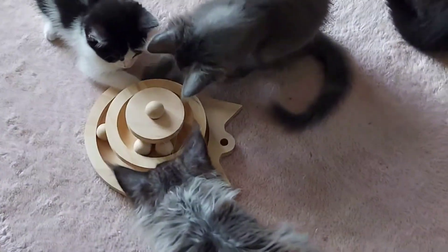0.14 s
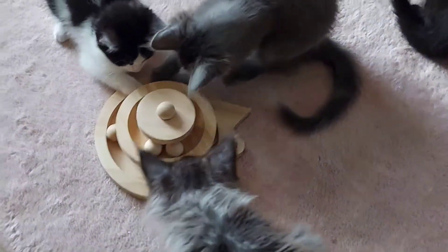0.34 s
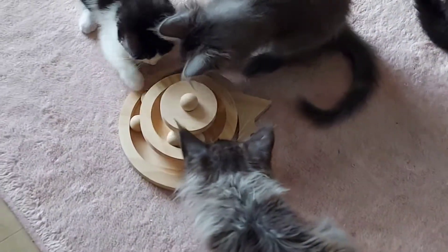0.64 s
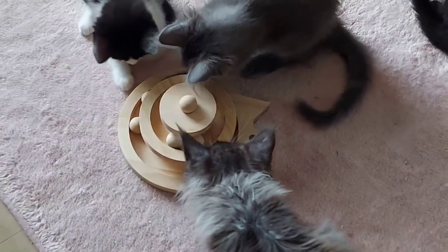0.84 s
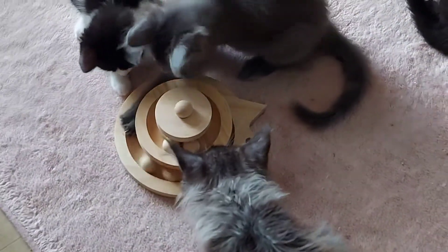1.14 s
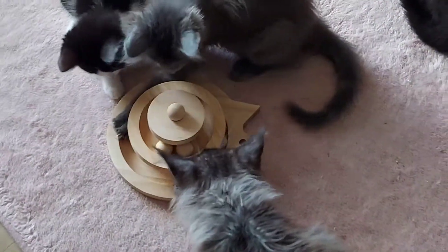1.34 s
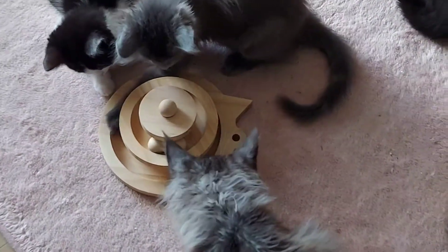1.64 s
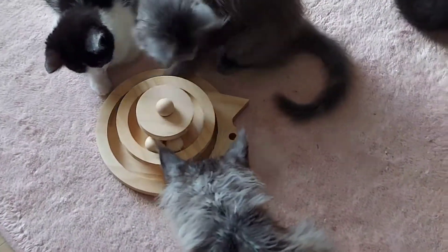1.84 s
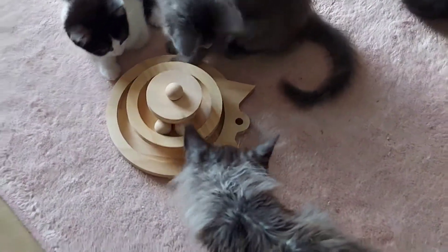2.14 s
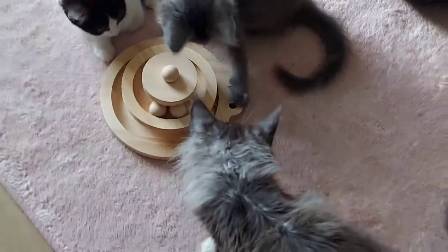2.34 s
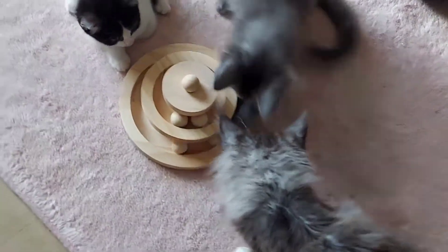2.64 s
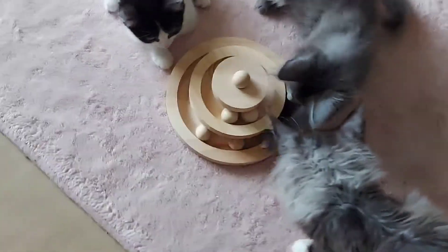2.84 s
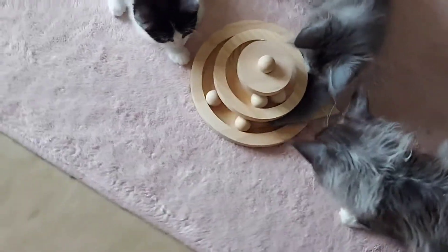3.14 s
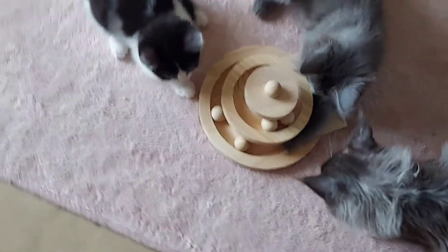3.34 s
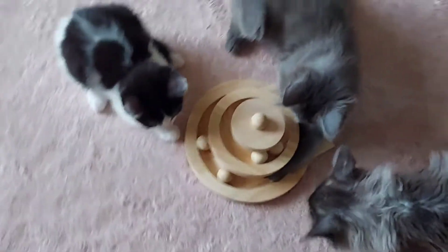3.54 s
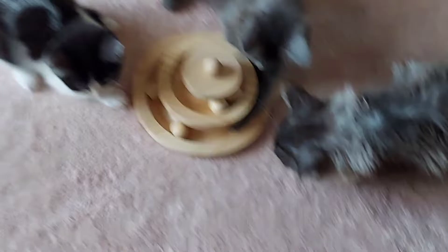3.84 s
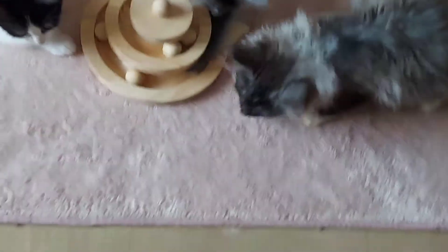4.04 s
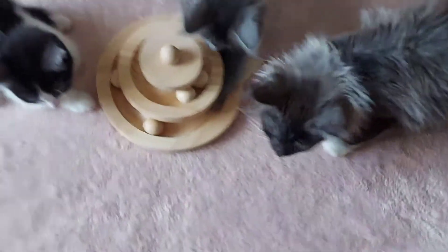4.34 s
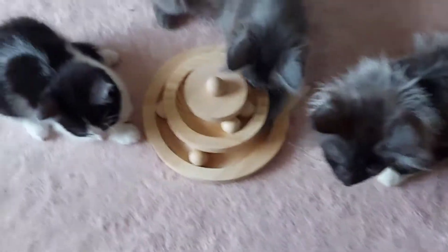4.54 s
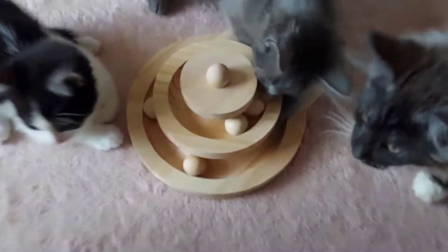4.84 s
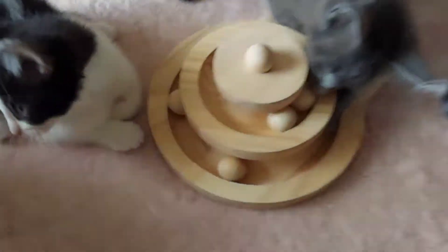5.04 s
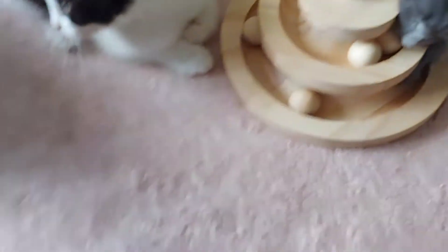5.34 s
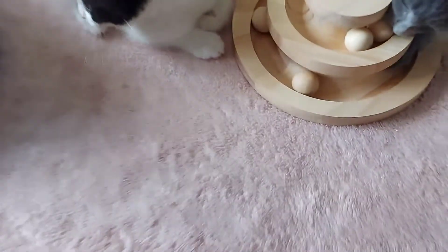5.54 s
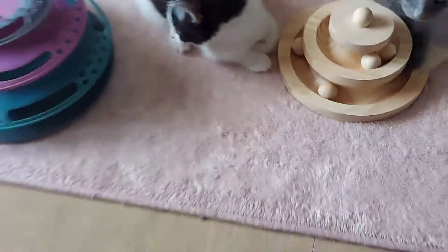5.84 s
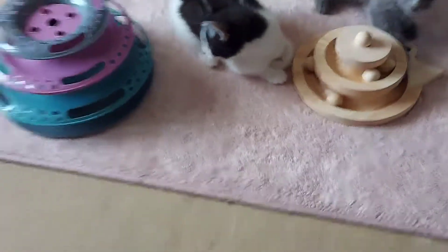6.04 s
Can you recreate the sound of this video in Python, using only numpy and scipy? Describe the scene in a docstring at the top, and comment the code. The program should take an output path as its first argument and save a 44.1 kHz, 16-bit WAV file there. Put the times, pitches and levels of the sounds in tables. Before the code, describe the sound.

Wooden balls knock, rattle and clack around a hollow wooden track as paws scuff carpet, then soft bumps and close clothing rustle.

```python
"""In a bare-sounding room, kittens bat wooden balls around a tiered wooden track standing on a carpet.
Rolling and knocks excite the track's damped modes; balls clack together as short bursts of bright noise.
Paws brush the pile as grainy high noise, and a thin high ring wavers as narrow-band noise.
Play dies down to a few soft bumps; clothing then rustles close to the microphone as noise with tiny catches.
A decaying diffuse tail and a faint steady noise make up the room."""
import sys
import numpy as np
from scipy import signal
from scipy.fft import rfft, irfft, next_fast_len
from scipy.io import wavfile
from scipy.ndimage import uniform_filter1d

SR = 44100
rng = np.random.default_rng(int(sys.argv[2]) if len(sys.argv) > 2 else 0)


def master(y):
    """Save y as 16-bit WAV."""
    cut = np.clip(np.atleast_2d(y).T, -1, 1)
    pcm = np.round(cut * 32767)  # scale
    wavfile.write(sys.argv[1], SR, pcm.astype(np.int16))


N = 273856

# All levels are relative: filters and mixing gains follow.
# Steady noise of the quiet room: (frequency [Hz], level [dB])
FLOOR_COLOUR = [(15, -59.5), (25, -34), (45, -27), (64, -5.5), (206, -21.5), (285, -17), (427, -27),
                (1290, -23.5), (3430, -35), (5730, -40), (12900, -26.5), (16000, -29.5)]
FLOOR_DB = -70
# Likeness of left and right in the noises: (frequency [Hz], correlation [-1 to 1])
EAR_LIKENESS = [(40, 0.7), (120, .92), (300, 0.84), (600, 0.78), (1200, 0.084), (2400, 0.098),
                (16000, 0.13)]
# Decay of the room's tail: (frequency [Hz], time to fall 60 dB [s])
ROOM_DECAY = [(150, 0.15), (500, 0.24), (1500, 0.34), (4000, 0.33), (8000, 0.46), (15000, 0.067)]
# Colour of the room's tail: (frequency [Hz], level [dB])
TAIL_COLOUR = [(100, -3.5), (220, -4), (450, 2.5), (1000, 0), (2000, -1.5), (4200, 0), (8000, -2),
               (15000, -5.5)]
CUTOFF_HZ = 15900

# Vibration modes of the wooden track: (frequency [Hz], level [dB], time to fall 60 dB [s])
TRACK_MODES = [(316.4, -31, 0.073), (416, -24, 0.061), (490, -28, 0.078), (630, -19.5, 0.051),
               (835, -16.5, 0.015), (1005.5, -15.5, 0.068), (1282, -8, 0.045), (1456, -13.5, 0.055),
               (1700, -1, 0.017), (1907, -3.5, 0.019), (2234, -0.5, 0.016), (2423, -4, 0.016),
               (2960, -10, 0.011), (3200, -25.5, .012), (3860, -12, 0.019), (4240, -19.5, 0.023),
               (4770, -39.5, .01)]
# A batted ball speeds up and runs out: (start [s], fastest [s], stop [s], level [dB])
BALL_ROLLS = [(0.0, .15, 0.54, -61), (.88, 1.2, 1.8, -50), (1.5, 1.78, 1.99, -60), (2.235, 2.31, 2.59, -56),
              (2.38, 2.68, 2.97, -55), (2.8, 3.0, 3.47, -70)]
RUMBLE_LAW, RATTLE_LAW = 1.51, 1.8   # amplitude as a power of speed
# A ball knocks on a rim: (time [s], peak level [dB], favoured frequency [Hz])
RIM_KNOCKS = [(0.033, -13, 1710), (0.2094, -27, 1654), (0.38, -44.5, 1270), (0.913, -34, 990),
              (0.924, -35, 630), (1.0234, -28, 1780), (1.1315, -29, 1130), (1.1381, -23.5, 1970),
              (1.254, -30.5, 1710), (1.2637, -27, 1680), (1.276, -25, 1790), (1.2877, -21.5, 1775),
              (1.2968, -29, 1720), (1.3203, -17, 2096), (1.33, -28, 1610), (1.3472, -23, 1690),
              (1.4242, -35, 1280), (1.451, -16, 1580), (1.4625, -29.5, 2040), (1.4867, -34.5, 1660),
              (1.5576, -29.5, 1700), (1.5937, -36, 1730), (1.6296, -37.5, 1270), (1.704, -47, 1270),
              (1.8098, -23, 1730), (1.8199, -20.5, 1740), (2.256, -41, 1720), (2.273, -37, 1680),
              (2.2933, -14, 1950), (2.3264, -25.5, 1950), (2.3928, -27.5, 1940), (2.4424, -31, 1630),
              (2.4874, -32.5, 1210), (2.5026, -27, 1690), (2.5133, -23, 1700), (2.523, -33, 1270),
              (2.599, -29.5, 1330), (2.659, -31, 2000), (2.703, -33, 1270), (2.7138, -12.5, 2100),
              (2.7804, -30, 1270), (2.9201, -39, 1420), (2.9914, -41.5, 1270)]
USUAL_KNOCK_DB = -29
BODY_DB, BODY_LOSS = 0.5, 0.32   # low modes at a usual knock [dB]; their loss per dB of a harder one
MIDDLE_LOSS = 0.35   # loss of the middle modes per dB of a harder knock
EDGE_DB = -4   # tilt of the highest modes, the same at every knock

# Long strokes of paws and fur over carpet: (start [s], strongest [s], stop [s], level [dB])
PAW_STROKES = [(.04, .1, 0.27, -60.5), (.3, .42, 0.72, -59), (.56, .8, 1.21, -57), (1.0, 1.37, 1.66, -59.5),
               (1.68, 1.8, 1.94, -60), (2.15, 2.75, 3.17, -62), (3.45, 3.75, 10, -71.5),
               (4.56, 4.7, 4.92, -61), (5.17, 5.21, 7.5, -64.5)]
STROKE_LAW = 0.83   # amplitude as a power of speed
# Quick flicks of a paw over the pile: (time [s], level [dB], time to fall 60 dB [s])
PAW_FLICKS = [(0.273, -56.5, 0.059), (.316, -57, .045), (.344, -53, .05), (.36, -49, .08), (.414, -62, .2),
              (.51, -51, 0.05), (.679, -56, .05), (.771, -52, 0.088), (.815, -57, 0.067),
              (.8765, -49.5, 0.06), (1.058, -51, 0.3), (1.349, -54.5, 0.21), (3.441, -57.5, 0.2),
              (3.547, -60, 0.19)]
# Colour of fur on carpet: (frequency [Hz], level [dB])
PILE_COLOUR = [(2500, -6.5), (4200, -1.5), (5800, -10.5), (7200, -1), (9000, 1.5), (12000, -4), (16000, -5)]
# The thin high ring is stirred: (time [s], level [dB])
RING_STIRS = [(0.071, -49.5), (.35, -51), (.405, -61), (0.501, -62), (.65, -53.5), (.735, -57), (.803, -47),
              (.87, -48.5), (1.12, -52), (1.24, -56), (1.35, -49), (1.42, -59.5), (1.54, -58), (1.801, -50),
              (1.87, -63)]
SHIVER_SWELL_S, SHIVER_T60_S = 0.0092, 0.39
# Balls skid under a paw: (time [s], level [dB], centre [Hz], swell [s], time to fall 60 dB [s])
BALL_SKIDS = [(0.442, -46.5, 595, .003, 0.25), (0.584, -50.5, 700, 0.008, 0.13),
              (0.614, -38, 3260, 0.018, 0.098), (0.902, -40.5, 1200, 0.0023, 0.063),
              (0.916, -43, 800, 0.005, 0.13), (1.017, -37.5, 4500, 0.0027, 0.053),
              (1.047, -35, 3020, 0.015, 0.089), (2.879, -40.5, 2920, 0.01, 0.023),
              (3.139, -57.5, 1230, 0.0026, 0.054), (5.86, -51, 4200, 0.041, .2)]
# Ball against ball: (time [s], peak level [dB])
BALL_CLACKS = [(1.808, -14), (2.293, -16), (2.712, -28.5)]
# Colour of a clack: (frequency [Hz], level [dB])
CLACK_COLOUR = [(300, -41), (1000, -27), (1900, 4.5), (3000, -1), (4300, 3), (5200, -5.5), (6500, -18.5),
                (9000, -25), (16000, -35.5)]

# Colours of the three parts of a padded blow: (frequency [Hz], level [dB])
THUD_COLOUR = [(30, -10), (70, -3.5), (130, -4), (280, -4.5), (450, -17.5), (900, -30), (3000, -86)]
DULL_KNOCK_COLOUR = [(120, -41), (300, -0.5), (480, -0.5), (900, -7.5), (1500, -6), (2200, -13),
                     (3000, -15.5), (7000, -30.5)]
SCRAPE_COLOUR = [(700, -50), (2100, 17.5), (3200, -2), (4300, -3), (6000, -7), (11000, 0), (16000, -1)]
# Padded footfalls: (time [s], thud level [dB], dull knock level [dB])
PAW_FALLS = [(2.724, -48, -51.5), (3.085, -63.5, -61), (3.439, -67, -56), (3.535, -51, -44.5),
             (3.577, -42.5, -50), (3.85, -62, -54), (4.004, -55, -51), (4.097, -47.5, -53),
             (4.2, -55.5, -62), (4.39, -61.5, -57.5), (4.435, -61, -75), (4.677, -55, -57.5),
             (4.735, -51, -53)]
FOOT_SWELL_S, FOOT_T60_S = 0.0076, 0.22
FOOT_SCRAPE_DB = -3.5   # relative to the knock
# Vibration modes of a hollow tock: (frequency [Hz], level [dB], time to fall 60 dB [s])
TOCK_MODES = [(563, -3, 0.025), (642, 3.5, 0.02), (767, 2.5, 0.023), (960, -6, 0.0201), (1120, -2, 0.019),
              (1417, -3.5, 0.017), (2020, -7.5, 0.017)]
# Taps close to the microphone: (time [s], thud level [dB], knock level [dB], scrape level [dB])
CLOSE_TAPS = [(5.186, -69, -42, -38.5), (5.308, -48, -29, -30.5), (5.341, -45, -31, -35),
              (5.356, -38, -31.5, -34.5), (5.376, -46, -30, -38), (5.496, -45, -42.5, -38),
              (5.917, -42, -32, -40), (6.012, -37, -32, -55), (6.147, -56, -33, -46),
              (6.174, -32.5, -35, -60)]
TAP_SWELL_S, TAP_T60_S = 0.0019, 0.042
# Faint rolling further off: (start [s], fastest [s], stop [s], level [dB])
DISTANT_ROLLS = [(3.6, 4.75, 5.26, -60.5), (5.17, 5.4, 8.7, -59)]

# Faint shuffling before the clothing comes close: (start [s], strongest [s], stop [s], level [dB])
CLOTH_SHUFFLES = [(3.4, 3.47, 3.58, -62.5), (3.75, 4.08, 4.53, -62.5), (4.15, 4.4, 5.2, -66)]
SHUFFLE_RUB_DB = -8.5   # low rub, relative to the friction
# Close clothing: (time [s], rumble level [dB], rub level [dB], friction level [dB], hiss level [dB])
CLOTH_LEVELS = [(5.28, -76, -73, -67, -75), (5.304, -49.5, -48, -46.5, -60), (5.364, -48, -36, -40, -44.5),
                (5.442, -61, -45, -52, -61), (5.524, -69, -47.5, -50, -55.5), (5.77, -45, -45, -48, -58.5),
                (6.01, -50.5, -42.5, -44, -50.5), (6.134, -57, -48, -45, -49),
                (6.174, -37.5, -34, -43.5, -47), (6.21, -41, -36, -48, -50)]
# Colours of rumble, rub, friction and hiss: (frequency [Hz], level [dB])
RUMBLE_COLOUR = [(15, -47), (25, -17), (50, 1), (65, 7.5), (113, 1), (140, 0), (260, -10.5), (340, -33),
                 (570, -120)]
RUB_COLOUR = [(88, -11), (150, 2.5), (210, -10), (294, 5.5), (472, -3.5), (595, -3), (1500, -18),
              (1950, -56), (3300, -120)]
FRICTION_COLOUR = [(590, 7), (1000, 3), (1330, 2.5), (1860, -9.5), (2410, -2.5), (2840, -6.5), (3710, -5),
                   (7000, -17.5), (9100, -31), (15400, -120)]
HISS_COLOUR = [(3240, -30), (5500, -31), (6040, -9), (9490, -3.5), (11700, -0.5), (15100, -3), (16000, -9)]
# A sleeve slides past: (start [s], strongest [s], stop [s], level [dB])
SLEEVE_SLIDE = [(5.5, 5.72, 6.04, -43)]
SLEEVE_HZ, SLEEVE_SINK_OCTAVES_PER_S = 414.3, 2.6   # centre at the strongest moment; rate of fall


def from_db(db):
    """Logarithmic level: 20 dB is a tenfold amplitude."""
    return 10 ** (np.asarray(db) / 20)


def rms_one(x):
    """Power normalisation: the mean square becomes one."""
    return x / np.sqrt(np.mean(x ** 2) + 1e-20)


def at_hz(points, hz):
    """Logarithmic frequency scale: interpolate a table evenly along octaves."""
    f, value = np.transpose(points)
    return np.interp(np.log(np.maximum(hz, 1)), np.log(f), value)


def band(x, low_hz, high_hz, order=2):
    """Band-pass filtering: weaken everything outside two corner frequencies."""
    corners = [low_hz, min(high_hz, SR / 2 - 100)]
    return signal.sosfilt(signal.butter(order, corners, "band", fs=SR, output="sos"), x)


def delayed(x, seconds):
    """Propagation delay: the same waveform arrives later."""
    i = np.arange(len(x))
    return np.interp(i - seconds * SR, i, x, left=0)


def add(out, s, sound):
    """Superposition: sum a sound into the mix at a given time."""
    i = max(int(s * SR), 0)
    out[i:i + len(sound)] += sound[:N - i]


def burst(swell, t60):
    """Exponential decay: a linear swell to one, then a fall of 60 dB in t60 seconds."""
    t = np.arange(SR // 2) / SR
    return np.minimum(t / swell, 1) * np.exp(-np.log(1000) * np.maximum(t - swell, 0) / t60)


def gains(rows):
    """Amplitude envelopes: dB columns as gains, faded to silence outside their time span."""
    s, *columns = np.transpose(rows)
    t = np.arange(N) / SR
    fade = np.clip(np.minimum(t - s[0], s[-1] - t) / 0.04 + 1, 0, 1)
    return [fade * from_db(np.interp(t, s, column)) for column in columns]


def movements(rows, law):
    """Power law: speed rises and falls linearly, and amplitude is a power of speed; powers add."""
    t = np.arange(N) / SR
    each = [from_db(db) * np.interp(t, [start, top, stop], [0, 1, 0]) ** law
            for start, top, stop, db in rows]
    return np.sqrt(np.sum(np.square(each), axis=0))


def drift(rate):
    """Random modulation: straight lines join random values drawn at a given rate; rms one."""
    knots = rng.standard_normal(int(N / SR * rate) + 2)
    return rms_one(np.interp(np.arange(N) / SR * rate, np.arange(len(knots)), knots))


def noise(colour):
    """Partial coherence: coloured stereo noise of rms one, most alike between the ears in the bass."""
    size = next_fast_len(N, real=True)
    hz = np.arange(size // 2 + 1) * SR / size
    mid, side = rfft(rng.standard_normal((2, size)))
    alike = np.clip(at_hz(EAR_LIKENESS, hz), -1, 1)
    pair = np.sqrt(1 + alike) * mid + np.sqrt(1 - alike) * side * [[1], [-1]]
    # roll off near and beyond the ends of the table
    skirts = 1 / (1 + (hz / colour[-1][0]) ** 10) * hz / (hz + colour[0][0] / 2)
    return rms_one(irfft(pair * from_db(at_hz(colour, hz)) * skirts, size)[:, :N])


def grains(per_s, spread_db):
    """Poisson-like excitation: random clicks of uneven size and either sign."""
    sizes = from_db(spread_db * np.minimum(rng.exponential(1, N), 4))
    return sizes * rng.choice([-1, 1], N) * (rng.random(N) < per_s / SR)


def ring(clicks, hz, t60):
    """Damped resonance: each unit click starts a decaying sine of unit initial height."""
    r, w = from_db(-60 / (t60 * SR)), 2 * np.pi * hz / SR
    return signal.lfilter([0, np.sin(w)], [1, -2 * r * np.cos(w), r * r], clicks + 1e-18)


def rattled(per_s, spread_db):
    """Modal excitation: small contacts ring every track mode in random proportions; rms one."""
    skips = grains(per_s, spread_db)
    modes = sum(from_db(db) * ring(skips * rng.normal(0, 1, N), hz, t60) for hz, db, t60 in TRACK_MODES)
    return rms_one(band(modes, 250, 5000))


def padded(blows, swell_s, t60, lowest_hz=42):
    """Cushioned impact: a thud, a dull knock and a scrape share one short envelope."""
    out, envelope = np.zeros((2, N)), burst(max(swell_s, 1e-4), t60)
    envelope_rms = np.sqrt(np.mean(envelope ** 2))
    for k, colour in enumerate([THUD_COLOUR, DULL_KNOCK_COLOUR, SCRAPE_COLOUR]):
        texture = noise(colour)
        for s, *levels_db in blows:
            stretch = texture[:, int(s * SR) // 2:][:, :len(envelope)]   # starts elsewhere for each blow
            blow = rms_one(envelope * stretch) * envelope_rms
            for ear in range(2):
                add(out[ear], s, from_db(levels_db[k]) * blow[ear])
    return band(out, lowest_hz, SR / 2)


def quiet_room():
    """Stationary noise: a faint coloured background of constant power."""
    return from_db(FLOOR_DB) * noise(FLOOR_COLOUR)


def rolling(soft_hz=600, rumble_db=-1, rattle_db=4):
    """Roughness excitation: wood grain drums on the low modes; skips rattle all, more so at speed."""
    rumble, rattle = movements(BALL_ROLLS, RUMBLE_LAW), movements(BALL_ROLLS, RATTLE_LAW)
    drumming = grains(1500, spread_db=0.5)
    low = 0
    for k, (hz, db, t60) in enumerate(TRACK_MODES[:7]):
        softness = 1 / (1 + (hz / soft_hz) ** 4)
        low = low + from_db(db) * softness * ring(drumming, hz, t60) * (-1) ** k
    rumbling = from_db(rumble_db) * rumble * rms_one(band(low, 290, 1500))
    return rumbling + from_db(rattle_db) * rattle * rattled(170, spread_db=4)


def room(x, first_wall_s=0.0036, build_s=0.0058, even_over_hz=70):
    """Diffuse reverberation: a tail sets in after the first wall and decays at its own pace per octave."""
    t = np.arange(SR * 3 // 4) / SR
    size = len(t)
    source = rfft(noise(TAIL_COLOUR)[:, :size])
    hz, tail = np.arange(source.shape[1]) * SR / size, 0
    centres = np.geomspace(125, 16000, 8)
    for centre, share in zip(centres, np.eye(len(centres))):
        octave = irfft(source * at_hz(np.c_[centres, share], hz), size)
        tail = tail + octave * np.exp(-np.log(1000) * t / at_hz(ROOM_DECAY, centre))
    # even out the tail's spectrum over narrow bands, then apply the tail's colour
    spectrum = rfft(tail, 2 * size)
    width = int(even_over_hz * 2 * size / SR) + 1
    local_power = uniform_filter1d(np.abs(spectrum) ** 2, width, axis=1)
    local = np.sqrt(np.abs(local_power) + 1e-9)
    colour = from_db(at_hz(TAIL_COLOUR, np.arange(size + 1) * SR / (2 * size)))
    onset = np.clip((t - first_wall_s) / build_s, 0, 1)
    tail = irfft(spectrum / local * colour)[:, :size] * onset
    return signal.fftconvolve(np.atleast_2d(x), rms_one(tail) / np.sqrt(size), axes=1)[:, :N]


def knocks(scatter_db=3.5, favour_db=9, favour_octaves=0.12, rim_echo=0.22, rim_s=0.0017, contact_hz=5500):
    """Modal impact: the struck spot favours some modes, and soft knocks sound hollower."""
    hz, mode_db, t60 = np.transpose(TRACK_MODES)
    t, out = np.arange(SR // 6) / SR, np.zeros(N)
    modes = np.sin(2 * np.pi * hz[:, None] * t) * np.exp(-np.log(1000) * t / t60[:, None])
    chance = rng.standard_normal((len(RIM_KNOCKS), len(hz)))
    for (s, peak_db, spot_hz), luck in zip(RIM_KNOCKS, chance):
        harder_db = peak_db - USUAL_KNOCK_DB
        body_db, middle_db = BODY_DB - BODY_LOSS * harder_db, -MIDDLE_LOSS * harder_db
        tilt = [(650, body_db), (1200, middle_db), (1700, 0), (2300, 0.0035), (3600, EDGE_DB)]
        favour = favour_db * np.exp(-(np.log2(hz / spot_hz) / favour_octaves) ** 2)
        strengths = from_db(mode_db + at_hz(tilt, hz) + favour + scatter_db * luck)
        crack = (strengths @ modes) * np.minimum(t / 0.00064, 1)   # the contact takes a moment
        knock = crack + rim_echo * delayed(crack, rim_s)   # thrown back by the tier above
        add(out, s, from_db(peak_db) * knock / np.abs(knock).max())
    return band(out, 320, contact_hz)


def paws(level_db=0, grain_db=2.0, flick_swell_s=0.0033):
    """Friction noise: fur and claws catch in the pile, a grainy high hiss with quick flicks."""
    envelope = from_db(level_db) * movements(PAW_STROKES, STROKE_LAW)
    for s, db, t60 in PAW_FLICKS:
        add(envelope, s, from_db(db) * burst(flick_swell_s, t60))
    return envelope * noise(PILE_COLOUR) * rms_one(from_db(grain_db * drift(rate=190)))


def shiver(hz=6815, width_hz=70, level_db=-2, waver_db=3):
    """Narrow-band noise: a thin high ring swells each time it is stirred and wavers as it dies."""
    envelope = np.zeros(N)
    for s, db in RING_STIRS:
        add(envelope, s, from_db(db) * burst(SHIVER_SWELL_S, SHIVER_T60_S))
    sides = band(rng.standard_normal((2, N)), hz - width_hz / 2, hz + width_hz / 2, order=1)
    waver = from_db(level_db + waver_db * drift(rate=47))
    return waver * envelope * rms_one(band(sides, 6500, 7200))


def skids(width=1.77, grit_db=-5):
    """Stick-slip: a pressed ball judders in dense slips and grit, each skid in its own frequency band."""
    grit = rms_one(band(grains(3000, spread_db=3.5), 850, 5000, order=3))
    judder = rattled(4500, spread_db=5.0) + from_db(grit_db) * grit
    out = np.zeros(N)
    for s, db, centre_hz, swell, t60 in BALL_SKIDS:
        envelope = burst(swell, t60)
        stretch = np.roll(judder, -int(s * SR))[:len(envelope)]
        tinted = rms_one(band(stretch, centre_hz / width, centre_hz * width, order=1))
        add(out, s, from_db(db) * envelope * tinted)
    return out


def clacks(t60=0.02):
    """Hard-body collision: two balls meet in a short bright burst of noise."""
    envelope = np.zeros(N)
    for s, peak_db in BALL_CLACKS:
        # noise peaks stand above its rms level, hence 9 dB of allowance
        add(envelope, s, from_db(peak_db - 9) * burst(0.00042, t60))
    return envelope * noise(CLACK_COLOUR)


def footfalls():
    """Cushioned impact: paws land slowly on the carpet and scrape in step with the knock."""
    blows = [(s, thud_db, knock_db, knock_db + FOOT_SCRAPE_DB) for s, thud_db, knock_db in PAW_FALLS]
    return padded(blows, FOOT_SWELL_S, FOOT_T60_S)


def clothing(rub_db=-4, friction_db=0, crackle_db=-9, rumble_db=1.5, hiss_db=1, catch_db=1.5, lumps_db=2.0):
    """Sliding friction: cloth catches and crackles; close up it hisses and shakes the microphone."""
    rumble, rub, friction, hiss = gains(CLOTH_LEVELS)
    shuffle = movements(CLOTH_SHUFFLES, law=0.43)
    catches = rms_one(from_db(catch_db * drift(rate=250)))
    ticks = np.array([grains(90, spread_db=-1.5) for ear in range(2)])
    crackle = rms_one(band(ticks, 1080, 3300))
    sliding = from_db(friction_db) * catches * noise(FRICTION_COLOUR) + from_db(crackle_db) * crackle
    hissing = from_db(hiss_db) * hiss * catches * noise(HISS_COLOUR)
    bright = (friction + shuffle) * sliding + hissing
    dull = (from_db(rub_db) * rub + from_db(SHUFFLE_RUB_DB) * shuffle) * noise(RUB_COLOUR)
    lumps = from_db(rumble_db + lumps_db * drift(rate=30))
    shaking = lumps * rumble * noise(RUMBLE_COLOUR) * from_db([[1.5], [-1.5]])
    return bright + dull + shaking


def tock(at_s=3.5455, peak_db=-24, press_s=0.00499):
    """Modal impact: one dull, hollow blow from something padded swells, then rings out."""
    t, out = np.arange(SR // 6) / SR, np.zeros(N)
    ringing = 0
    for k, (hz, db, t60) in enumerate(TOCK_MODES):
        decay = np.exp(-np.log(1000) * t / t60)
        ringing = ringing + from_db(db) * np.sin(2 * np.pi * hz * (t - press_s)) * decay * (-1) ** k
    ringing = ringing * np.minimum(t / press_s, 1)
    add(out, at_s, from_db(peak_db) * ringing / np.abs(ringing).max())
    return out


def far_rolling(low_hz=1600, high_hz=2300):
    """Roughness excitation: faint uneven grinding of a ball some way off, in a narrow band."""
    ticks = grains(1200, spread_db=1.0) * from_db(6.1 * drift(rate=35))
    return movements(DISTANT_ROLLS, law=0.73) * rms_one(band(ticks, low_hz, high_hz))


def taps():
    """Brief contact: short, sharp touches close to the microphone."""
    return padded(CLOSE_TAPS, TAP_SWELL_S, TAP_T60_S)


def sleeve(width_hz=170):
    """Modulated carrier: a band of soft friction noise whose centre sinks as the fold opens."""
    start, strongest, stop, _ = SLEEVE_SLIDE[0]
    since = np.clip(np.arange(N) / SR, start, stop) - strongest
    centre_hz = SLEEVE_HZ * 2 ** (-SLEEVE_SINK_OCTAVES_PER_S * since)
    phase = 2 * np.pi * np.cumsum(centre_hz) / SR
    swish = drift(width_hz) * np.cos(phase) + drift(width_hz) * np.sin(phase)
    return movements(SLEEVE_SLIDE, law=1.23) * swish


def scene(toy_pan_db=1.2, toy_lag_s=0.00011, knock_db=1.5, toy_wet_db=-7, clack_wet_db=2, bump_wet_db=-5):
    """Interaural differences: the toy is louder and later at right; toy and blows excite the room."""
    toy = from_db(knock_db) * knocks() + rolling() + skids() + far_rolling()
    clack = clacks() * from_db([[-1], [1]])
    soft = footfalls() + taps() + tock()
    heard = np.array([toy, delayed(toy, toy_lag_s)]) * from_db([[-toy_pan_db], [toy_pan_db]])
    toy_echo = from_db(toy_wet_db) * room(toy) * from_db([[-1.5], [1.5]])
    blow_echo = room(from_db(clack_wet_db) * clack + from_db(bump_wet_db) * soft)
    near = (clothing() + sleeve()) * from_db([[0.6], [-0.6]])
    return heard + clack + soft + toy_echo + blow_echo + paws() + shiver() + near + quiet_room()


def record(dry):
    """Low-pass filtering: an elliptic filter cuts the top steeply."""
    return signal.sosfilt(signal.ellip(12, 0.1, 80, CUTOFF_HZ, fs=SR, output="sos"), dry)


dry = scene()
out = record(dry)
master(out)
```